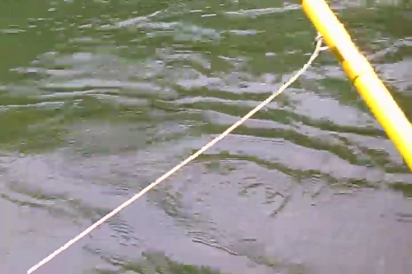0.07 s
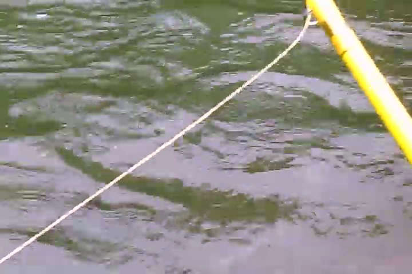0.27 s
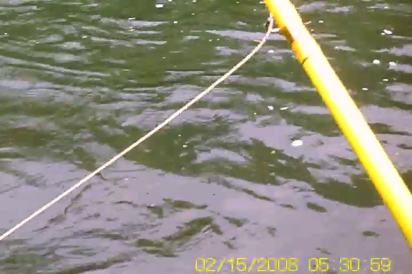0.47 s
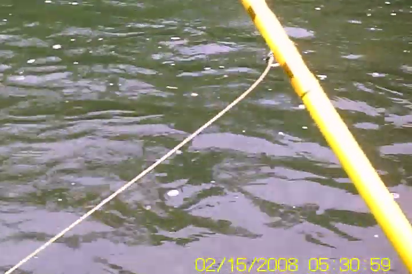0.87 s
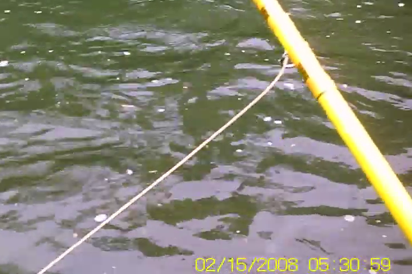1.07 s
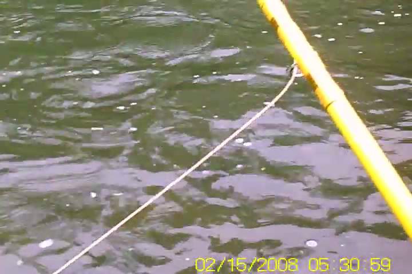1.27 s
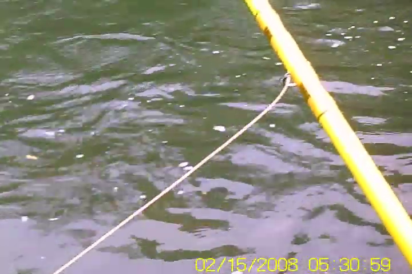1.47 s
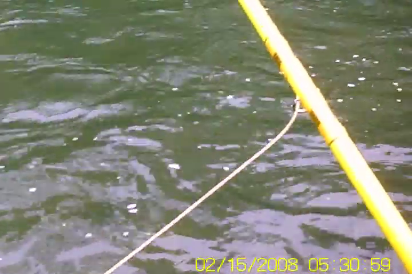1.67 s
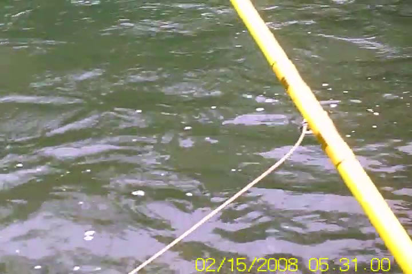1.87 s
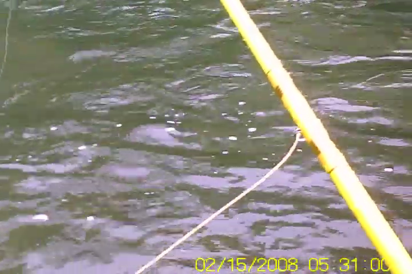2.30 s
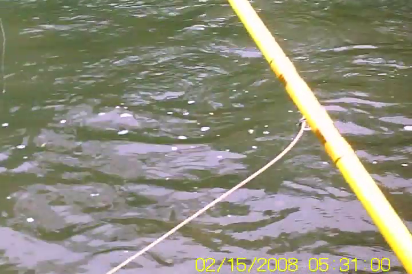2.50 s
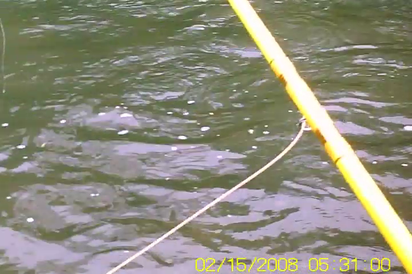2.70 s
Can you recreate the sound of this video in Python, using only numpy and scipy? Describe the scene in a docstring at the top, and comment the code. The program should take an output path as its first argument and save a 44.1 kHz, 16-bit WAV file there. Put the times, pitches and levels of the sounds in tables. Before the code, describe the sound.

A steady rush of flowing river, briefly interrupted by finger rubs and three close taps.

```python
"""River by a hand-held camera

A river rushes past the microphone, with tiny splashes and bubbles in the wash. In the first second,
right at the microphone, a finger rubs the case and knocks it three times; the cavity there rings and
overloads the recorder. A faint low flutter, probably electrical, runs in bursts over a steady hiss."""
import sys
import numpy as np
from scipy import signal
from scipy.fft import rfft, irfft
from scipy.io import wavfile
from scipy.ndimage import uniform_filter1d

SR = 44100
rng = np.random.default_rng(int(sys.argv[2]) if len(sys.argv) > 2 else 0)


def inscribe(sig):
    """Save sig as 16-bit PCM at rate SR to the path in sys.argv[1].

    A 1-D sig is mono; a 2-D sig holds one channel per row.
    Samples are clipped to [-1, 1] before scaling.
    """
    pcm = np.round(np.clip(np.atleast_2d(sig).T, -1, 1) * 32767)
    wavfile.write(sys.argv[1], SR, pcm.astype(np.int16))


N = 125685

# Rush of the river: freq_hz, relative_db
RIVER_COLOUR = [(20, -13), (65, 4), (100, -16), (140, -0.5), (200, -7.5), (260, -4), (340, -0.5),
                (500, -0.76), (800, 1), (1100, 2), (1600, -3), (1820, -2), (1910, -9), (2030, -0.5),
                (2600, -5)]
# Strength of the wash at the microphone: time_s, level_db
RIVER_LEVEL = [(0, -33), (0.3, -33.5), (0.55, -31.5), (0.85, -33), (1.12, -34), (1.6, -34), (2.1, -33.5),
               (2.45, -34.5), (2.85, -33.5)]
# Brightness of the wash: time_s, tilt_db_per_octave
RIVER_TILT = [(0, -1.5), (0.6, 0.4), (1.1, -1), (1.6, -0.34), (2.1, -1.5), (2.85, -1.1)]
# Hollow gurgle of the eddies: time_s, pitch_hz, lift_db
EDDY_GURGLE = [(0, 420, -0.5), (0.6, 1080, 0), (1.4, 930, 0.5), (1.9, 830, 2), (2.2, 685, 4),
               (2.5, 640, 4.5), (2.85, 600, 4)]
# The hand shading the microphone opening: time_s, treble_edge_hz, resonance_db
HAND_SHADE = [(0, 2030, 5), (0.3, 1610, 7), (0.6, 1640, 2.5), (0.9, 1700, 7.5), (1.1, 1960, 5.5),
              (1.6, 2050, 3), (2.1, 2080, 6.5), (2.85, 2090, 6)]
# Knocks on the case: start_s, contact_s, crackle_db, ring_db, pitch_hz, ring_t60_s,
# rebound_after_s, rebound_db, softness_s
CASE_KNOCKS = [(0.4556, 0.0023, -2.5, -2.5, 1990, 0.017, 0.0020, -5.5, 0.0002),
               (0.7277, 0.0041, -1, -11, 1915, 0.017, 0.00313, -1, 0.0002),
               (1.0005, 0.001, -32, 7.5, 2020, 0.0075, 0.00215, 9, 0.0009)]
# Modes of the cavity at the microphone: pitch_ratio, relative_db, t60_ratio
CAVITY_MODES = [(1, 0, 1), (1.14, -14, 0.9), (1.9, -25, 0.8)]
# Thin ring of the case: pitch_hz, relative_to_crackle_db, t60_s
CASE_MODES = [(7600, -22, 0.022), (8250, -24, 0.035), (10100, -25, 0.012)]
# Crackle of the contact: freq_hz, relative_db
CRACKLE_COLOUR = [(100, -26), (300, 0.5), (700, -10.5), (1300, -8.5), (2000, 6), (3300, -2), (4800, -5),
                  (6800, 2), (8800, -1.5), (10500, 4), (12500, -6.5)]
# Finger strokes on the case: start_s, length_s, level_db, rise_s, fall_s, treble_db
FINGER_STROKES = [(0.414, 0.068, -37, 0.041, 0.0045, -3), (0.455, 0.09, -31.5, 0.0042, 0.033, 0),
                  (0.646, 0.055, -35.5, 0.029, 0.012, -6), (0.689, 0.089, -32.5, 0.011, 0.052, -6),
                  (0.759, 0.12, -34.5, 0.038, 0.034, -7.5), (0.864, 0.09, -42, 0.022, 0.013, -8),
                  (0.94, 0.083, -38, 0.017, 0.0073, -6.5)]
# Friction of skin on the case: freq_hz, relative_db
SKIN_COLOUR = [(300, -26), (1500, -11), (2000, -0.5), (2300, -4.5), (2700, -0.5), (3000, -4), (3350, 0),
               (3700, -7), (4200, -8.5), (5400, -19.5), (6800, -10.5), (7800, -8), (8300, -2.5),
               (8800, -13.5), (10000, -12.5), (12000, -23)]
# Fine tick on the case: freq_hz, relative_db
CASE_TICK_COLOUR = [(5000, -30), (7500, -14), (9500, 8), (10500, -6), (12500, -6)]
# Bursts of low flutter: first_pulse_s, last_pulse_s, pulse_count
FLUTTER_BURSTS = [(0.347, 0.571, 8), (0.597, 0.748, 6), (0.793, 1.098, 10), (1.167, 1.42, 8),
                  (1.488, 1.631, 5), (1.702, 1.88, 6), (1.946, 2.268, 10), (2.339, 2.516, 6)]
# Soft thuds as the flutter starts and stops: middle_s, half_length_s, level_db
FLUTTER_THUDS = [(0.24, 0.023, -27), (0.295, 0.0063, -20.5), (0.312, 0.0085, -24), (2.576, 0.018, -18.5)]
# Hiss of the microphone: freq_hz, relative_db
HISS_COLOUR = [(20, -16), (70, 5), (200, 3), (500, -30), (2300, 7), (2700, 8), (3000, 9), (3400, 13),
               (3750, 4.5), (4300, 1), (5300, 0.5), (6500, 1.5), (8200, 0.3), (9500, 0), (11000, -2.5),
               (13000, -4.5)]
# Faint high whistles: middle_s, half_length_s, pitch_hz, glide_hz_per_s, level_db
HIGH_WHISTLES = [(0.062, 0.036, 6200, -500, -58), (1.27, 0.06, 6130, -1200, -66)]


def amp(db):
    """Decibels to gain."""
    return 10 ** (np.asarray(db) / 20)


def unit(x):
    """Scales to rms 1."""
    return x / np.sqrt(np.mean(x ** 2) + 1e-20)


def spectrum(points, hz):
    """Reads a colour table on a log-frequency axis, in dB."""
    freqs, db = np.transpose(points)
    return np.interp(np.log(hz + 1), np.log(freqs + 1), db)


def curves(points, t):
    """Reads a time table: one curve for each column after time_s."""
    times, *columns = np.transpose(points)
    return [np.interp(t, times, column) for column in columns]


def add(mix, start_s, sound):
    """Mixes a sound in at a time."""
    part = mix[max(round(start_s * SR), 0):][:len(sound)]
    part += sound[:len(part)]


def noise(colour):
    """Steady noise of a given colour, rms 1."""
    gain = amp(spectrum(colour, np.fft.rfftfreq(N, 1 / SR)))
    return unit(irfft(rfft(rng.standard_normal(N)) * gain, N))


def drift(count, smooth):
    """Random wander, averaged over `smooth` steps, rms 1."""
    return unit(uniform_filter1d(rng.standard_normal(count), smooth))


def mode(t, hz, db, t60):
    """One resonance ringing down by 60 dB in t60 seconds."""
    return amp(db - 60 * t / t60) * np.sin(2 * np.pi * hz * t)


def lowpass(x, hz, taps):
    """Linear-phase low-pass."""
    return signal.oaconvolve(x, signal.firwin(taps, hz, window=("kaiser", 9), fs=SR), "same")


def river(patch_db=1.0, swell_db=0.09, pivot_hz=860, gurgle_octaves=0.33, resonance_octaves=0.32):
    """Water rushing past: gurgling, patchy noise, its treble edge moved by the hand at the microphone."""
    frame, hop = 1024, 256
    t = np.arange(N // hop + 5) * hop / SR
    hz = np.fft.rfftfreq(frame, 1 / SR)[:, None]
    real, imag, patches = rng.standard_normal((len(t), len(hz), 3)).T
    patches = uniform_filter1d(patches, size=7, axis=0)  # across frequency
    patches = unit(uniform_filter1d(patches, size=10, axis=1))  # across time
    water_db = spectrum(RIVER_COLOUR, hz) + patch_db * patches + swell_db * drift(len(t), smooth=14)
    tilt, = curves(RIVER_TILT, t)
    water_db += tilt * np.clip(np.log2((hz + 1) / pivot_hz), -2, 1)
    gurgle_hz, lift_db = curves(EDDY_GURGLE, t)
    water_db += lift_db * np.exp(-(np.log2((hz + 1) / gurgle_hz) / gurgle_octaves) ** 2)
    # The hand resonates just below the edge and cuts steeply above it.
    edge_hz, resonance_db = curves(HAND_SHADE, t)
    edge_ratio = (hz + 1) / edge_hz
    hand_db = resonance_db * np.exp(-(np.log2(edge_ratio / 0.88) / resonance_octaves) ** 2)
    gain = amp(water_db + hand_db) / np.sqrt(1 + edge_ratio ** 11)
    _, wash = signal.istft((real + 1j * imag) * gain, nperseg=frame, noverlap=frame - hop)
    level_db, = curves(RIVER_LEVEL, np.arange(N) / SR)
    return amp(level_db) * unit(wash[:N])


def bubbles(level_db=-51, per_s=260, low_hz=414.4, high_hz=1980, sizes=30, cycles=9, glide=0.022):
    """Small bubbles in the wash ring for a few cycles and rise in pitch."""
    out, t = np.zeros(N), np.arange(SR // 10) / SR
    for hz in np.geomspace(low_hz, high_hz, sizes):
        age = t * hz / cycles
        envelope = (1 - np.exp(-t * hz)) * np.exp(-age)
        ring = envelope * np.sin(2 * np.pi * hz * t * (1 + glide * age / 2))
        births = rng.random(N) < per_s / sizes / SR
        strength_db = 4 * np.minimum(rng.exponential(1, N), 3)
        out += signal.oaconvolve(births * amp(strength_db), ring)[:N]
    return amp(level_db) * unit(out)


def knocks(release_s=0.0001, push_hz=560, push_width_s=0.0006):
    """A crackling contact pushes and rings the case; blow and rebound ring the microphone cavity."""
    out, t = np.zeros(N), np.arange(SR // 20) / SR
    for start, contact, crackle_db, ring_db, hz, t60, rebound_after, rebound_db, softness in CASE_KNOCKS:
        cavity = sum(mode(t, hz * ratio, db, t60 * share) for ratio, db, share in CAVITY_MODES)
        cavity *= 1 - np.exp(-(t / softness) ** 2)
        case = sum(mode(t, *row) for row in CASE_MODES)
        crackle = np.exp(-np.maximum(t - contact, 0) / release_s) * noise(CRACKLE_COLOUR)[:len(t)]
        late = t - 0.78 * contact  # the dull push comes late in the contact
        push = amp(-2) * np.exp(-(late / push_width_s) ** 2) * np.sin(2 * np.pi * push_hz * late)
        add(out, start, amp(crackle_db) * (crackle + case + push) + amp(ring_db) * cavity)
        add(out, start + rebound_after, amp(rebound_db) * cavity)
    return out


def rubs(grain=0.16, treble_hz=5000):
    """Skin slides over the case in short, slightly grainy strokes, close to the microphone."""
    t, out = np.arange(N) / SR, np.zeros(N)
    for start, length, level_db, rise, fall, treble_db in FINGER_STROKES:
        friction = noise([(hz, db + treble_db * (hz > treble_hz)) for hz, db in SKIN_COLOUR])
        envelope = np.clip(np.minimum((t - start) / rise, (start + length - t) / fall), 0, 1)
        out += amp(level_db) * envelope * friction
    return out * unit(np.exp(grain * drift(N, smooth=150)))


def tick(start_s=0.8092, level_db=-20.5, fade_s=0.0006):
    """One light, very high tick on the case between the knocks."""
    age = np.arange(N) / SR - start_s
    return amp(level_db) * (age > 0) * np.exp(-abs(age) / fade_s) * noise(CASE_TICK_COLOUR)


def flutter(pulse_db=-20.5, accent_db=1.0, half_width_s=0.0069, settle_hz=0.68):
    """Even runs of soft low pulses, probably electrical, opened and closed by dull thuds."""
    t, out = np.arange(N) / SR, np.zeros(N)
    for first, last, count in FLUTTER_BURSTS:
        for middle in np.linspace(first, last, count):
            db = pulse_db + accent_db * (middle == first)
            out -= amp(db) * np.exp(-abs((t - middle) / half_width_s) ** 1.47)
    for middle, half_length, db in FLUTTER_THUDS:
        out -= amp(db) * np.exp(-abs((t - middle) / half_length) ** 3.5)
    # The pulses all push one way; the high-pass lets the baseline settle back.
    return signal.lfilter(*signal.butter(1, settle_hz, "high", fs=SR), out)


def hiss(level_db=-47.5):
    """The microphone's own steady noise."""
    return amp(level_db) * noise(HISS_COLOUR)


def whistles(waver_hz=60):
    """Thin, wavering tones, faint against the hiss."""
    t, out = np.arange(N) / SR, np.zeros(N)
    waver = waver_hz * drift(N, smooth=200)
    for middle, half_length, hz, glide, db in HIGH_WHISTLES:
        phase = 2 * np.pi * np.cumsum(hz + glide * (t - middle) + waver) / SR
        envelope = np.exp(-((t - middle) / half_length) ** 2)
        out += amp(db) * envelope * unit(np.sin(phase))
    return out


def scene():
    """At the river with one microphone: water, handling and the camera's own noise, in mono."""
    water = river() + bubbles()
    handling = rubs() + knocks() + tick()
    background = flutter() + hiss() + whistles()
    return (water + handling + background)[None]


def record(dry):
    """The camera's input overloads, its narrow band rounds that off, and its output clips again."""
    ceiling = amp(-2.4)
    overloaded = np.clip(dry[0], -ceiling, ceiling)
    rounded = lowpass(overloaded, hz=11000, taps=65)
    clipped = np.clip(rounded, -ceiling, ceiling)
    return lowpass(clipped, hz=16400, taps=255)[None]


dry = scene()
out = record(dry)
inscribe(out)
```